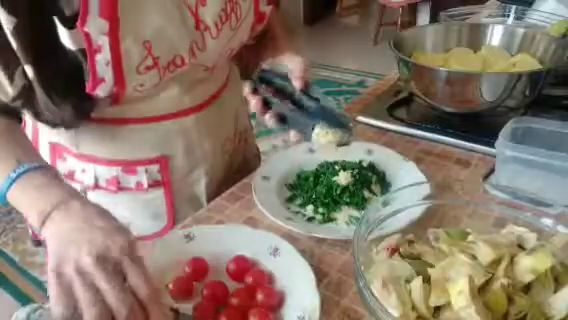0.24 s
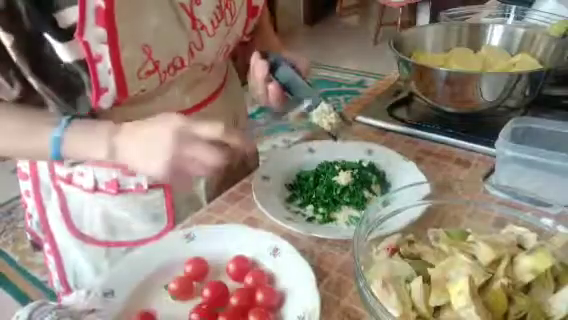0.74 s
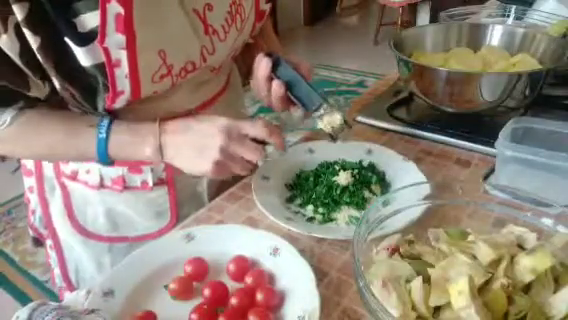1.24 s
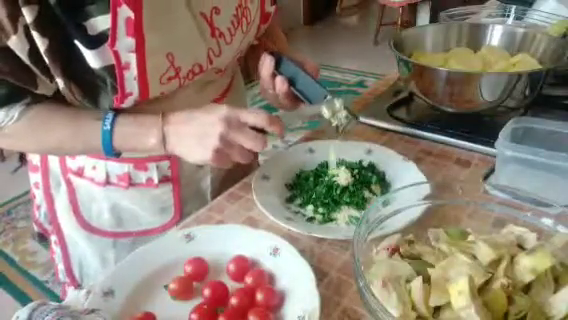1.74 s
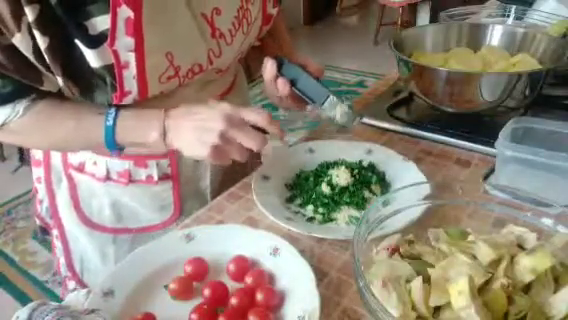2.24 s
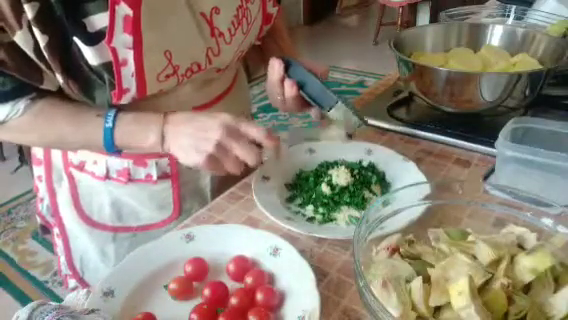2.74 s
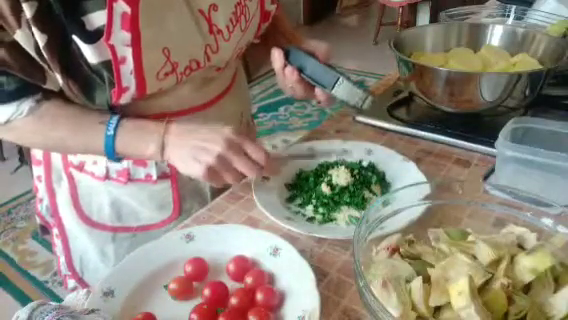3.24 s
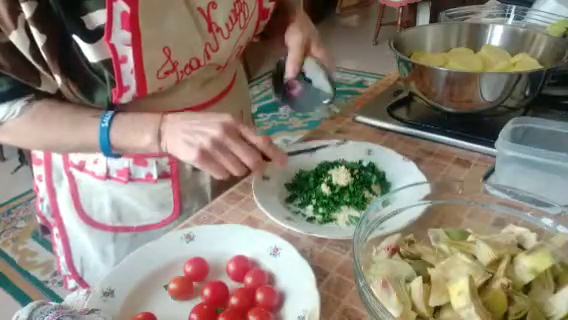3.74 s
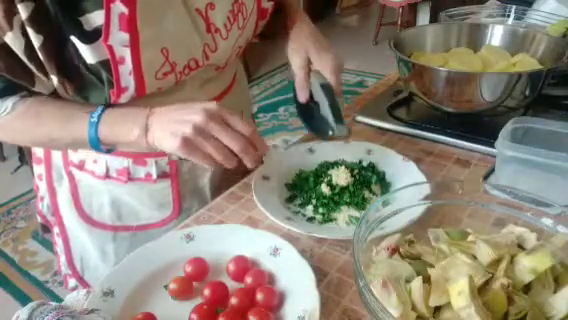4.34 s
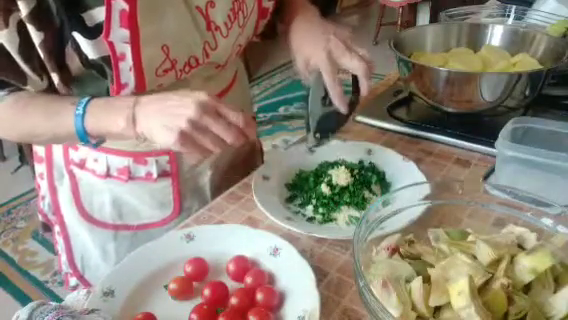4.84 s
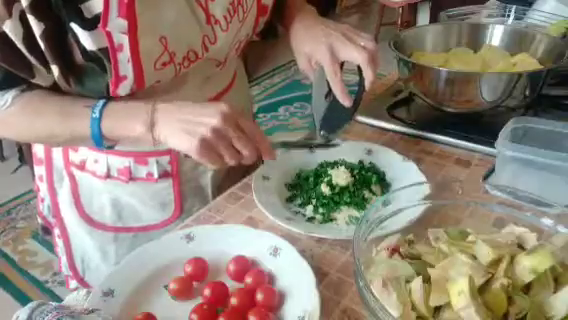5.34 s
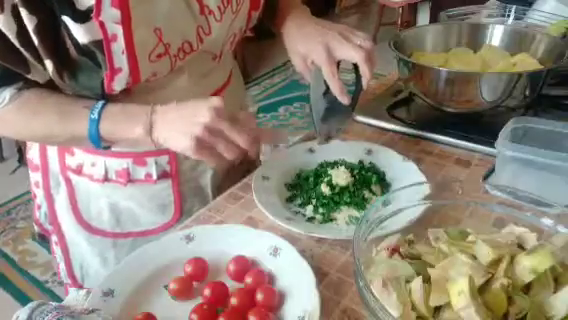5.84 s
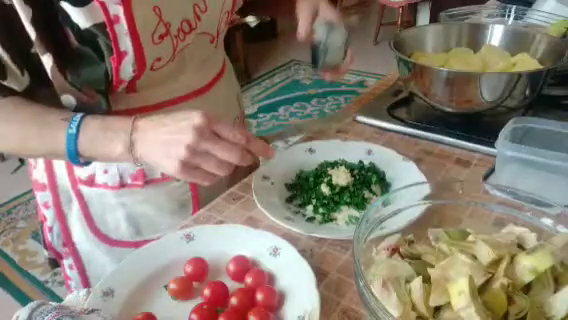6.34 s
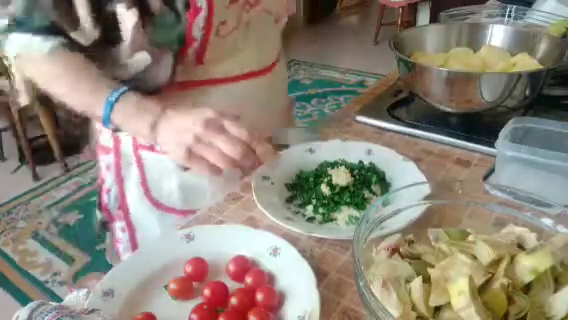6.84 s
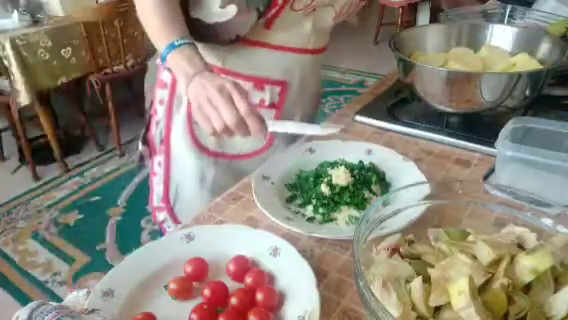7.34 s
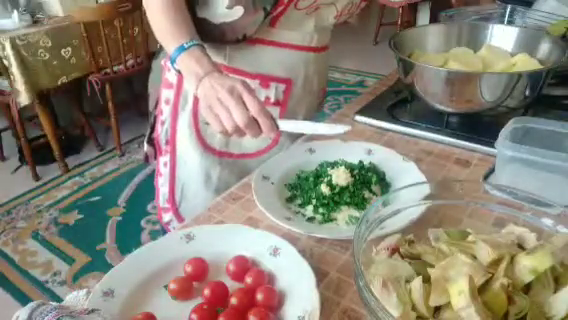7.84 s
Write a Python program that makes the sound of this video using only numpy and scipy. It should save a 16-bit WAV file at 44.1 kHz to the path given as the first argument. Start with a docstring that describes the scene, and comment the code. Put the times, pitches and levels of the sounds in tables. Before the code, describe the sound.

In a quiet home kitchen, a faint rustle and a light ceramic clink come first. After a few weak touches, a table knife scrapes and taps a steel garlic press in quick bright clicks, pauses, then taps harder. A soft low bump follows, and the press is put down on wood with a dull knock and small rattles. Close stereo microphone, short room echo, faint hum.

```python
"""Over a quiet room tone and a hum that comes and goes, a soft rustle is faintly heard and a plate clinks.
A table knife then taps and scrapes crushed garlic off a steel press, with one faint hollow drag early on.
Near the end comes a soft low bump, then the press is put down on wood with a dull knock. Steel, plate and
wood are noisy contacts that ring decaying tones; rasps, rustles, drag and air are shaped noise, and sparse
echoes make the room. Two microphone ports hear the treble differently and the bass alike."""
import sys
import numpy as np
from scipy import signal
from scipy.io import wavfile
from scipy.ndimage import uniform_filter1d

SR = 44100
rng = np.random.default_rng(int(sys.argv[2]) if len(sys.argv) > 2 else 0)


def output_pcm(signal):
    """Save a mono or channel-first signal as 16-bit PCM at the path in sys.argv[1].

    Samples are clipped to [-1, 1] before scaling.
    """
    pcm = np.clip(np.atleast_2d(signal).T, -1, 1) * 32767
    wavfile.write(sys.argv[1], SR, np.round(pcm).astype(np.int16))


N = 357210  # length in samples
HZ = np.fft.rfftfreq(2048, 1 / SR)  # the frequencies on which filter shapes are given
TOUCH_S = .006  # seconds from the start of a blow to its main contact


def amp(db):
    """Turns dB into gain."""
    return 10 ** (np.asarray(db) / 20)


def evened(x):
    """Scales a signal to an rms of 1."""
    return x / np.sqrt(np.mean(x ** 2) + 1e-20)


def read(points, hz):
    """Reads a curve between its points on a log-frequency axis."""
    f, value = np.transpose(points)
    return np.interp(np.log(hz + 1), np.log(f + 1), value)


def add(mix, s, sound):
    """Mixes a stereo sound in at time s, in seconds."""
    part = mix[:, round(s * SR):][:, :sound.shape[1]]
    part += sound[:, :part.shape[1]]


def tone(hz, body_db, edge_db):
    """Lifts or lowers the body (about 1.5 to 4 kHz) and the edge above 10 kHz, in dB."""
    body = 1 / (1 + (hz / 4000) ** 4) / (1 + (1500 / (hz + 1)) ** 4)
    edge = 1 / (1 + (10000 / (hz + 1)) ** 6)
    return body_db * body + edge_db * edge


def tilt(hz, bright_db):
    """Tilts a spectrum by some dB per octave, level near 600 Hz and easing off in the bass."""
    return bright_db * np.log2((hz + 100) / 700)


def coloured(x, shape_db):
    """Filters causally, with the gain given in dB on the frequencies HZ."""
    both_sides_db = np.r_[shape_db, shape_db[-2:0:-1]]
    log_gain = np.log(amp(np.maximum(both_sides_db, -100)))
    # the phase that belongs to this gain puts the energy as early as possible
    response = np.exp(np.conj(signal.hilbert(log_gain)))
    taps = np.fft.ifft(response).real[:len(shape_db)]
    return signal.oaconvolve(x, taps[None], axes=1)[:, :x.shape[1]]


def bass_shared(x, corner_hz):
    """Long waves reach both ports alike, so the bass of the two sides is averaged."""
    low = signal.lfilter(*signal.butter(N=2, Wn=corner_hz, fs=SR), x)
    return x - low + np.sqrt(2) * low.mean(0)


def grit(count, spread_db, most=6):
    """Makes two unlike trains of micro-contacts, a few much larger than the rest."""
    size = np.minimum(rng.exponential(1, count), most)
    return rng.standard_normal((2, count)) * amp(spread_db * size)


def blow(modes, shape_db, chatter_ms, ring_db, rattle_db, detune, count):
    """After a faint first touch, contacts chatter and die out; they crack and set the modes ringing."""
    t = np.arange(count) / SR
    since = t - TOUCH_S
    touch = 0.04 * np.exp(-abs(since) / 0.002) + np.exp(-abs(since) / .0007)
    contacts = grit(count, 2.9) * np.where(since < 0, touch, np.exp(-abs(since) / (chatter_ms / 1000)))

    # each blow has a new spot and grip: other mode levels, phases and pitches
    hz, db, t60 = np.transpose(modes)[:, :, None]
    level, phase, shift = rng.standard_normal((2, 3, len(modes), 1)).swapaxes(0, 1)
    pitch = hz * (1 + detune * shift)
    # the rings flicker at random, each on its own, so they sound rough
    steps = np.repeat(rng.standard_normal((len(modes), count // 160 + 1)), 160, axis=1)[:, :count]
    flicker = rattle_db * np.tanh(2 * uniform_filter1d(steps, size=120, axis=1))
    decay = amp(db + flicker - 60 * t / t60)
    rings = decay * amp(level) * np.sin(2 * np.pi * pitch * t + phase)

    chatter = .5 * contacts[:1] / np.linalg.norm(contacts[0])
    drive = chatter + signal.unit_impulse(count, round(TOUCH_S * SR))
    ring = signal.fftconvolve(drive, rings.sum(1), axes=1)[:, :count]
    crack = coloured(contacts, shape_db)
    return crack / abs(crack).max() + amp(ring_db) * ring / abs(ring).max()


def struck(events, modes, spectrum, ring_db, rattle_db, detune):
    """Plays blows on a plate or a board, each tilted brighter or duller."""
    out = np.zeros((2, N))
    for s, db, chatter_ms, bright_db in events:
        tilted = [(f, mode_db + tilt(f, bright_db), t60) for f, mode_db, t60 in modes]
        shape_db = read(spectrum, HZ) + tilt(HZ, bright_db)
        hit = blow(tilted, shape_db, chatter_ms, ring_db, rattle_db, detune, count=SR // 4)
        add(out, s - TOUCH_S, amp(db) * hit)
    return bass_shared(out, 1100)


# Colour of the room's hiss. Each row: frequency in Hz, strength in dB per Hz.
AIR = [(10, 1), (24, -14.5), (42, -5.5), (62, -11), (82, -20.5), (105, -16), (179, -24.5), (236, -24.5),
       (290, -32.5), (598, -33.5), (743, -34), (1380, -39), (3290, -38.5), (7600, -37.5), (14600, -40),
       (16500, -49.5)]
AIR_DB = -57.5  # level before the swells and soft patches
# How alike the two sides are. Each row: frequency in Hz, likeness (1 is the same).
LIKENESS = [(60, 0.97), (380, 0.28), (2380, 0.032), (15000, 0.24)]
# Slow swells of the room. Each row: time in seconds, swell of the rumble in dB, of the middle band in dB.
SWELLS = [(0, 4, 6.5), (1.2, 0.5, 5), (2.8, 4, 2.5), (3.601, 0.5, 1), (6.102, -1, 2), (6.449, -4, 7),
          (6.802, -3.5, -2), (8.1, 1.5, 5.5)]


def room_tone():
    """Hiss with soft patches; the rumble and the middle band swell on their own."""
    frames, hz = N // 512 + 5, HZ[:, None]
    a, b, c, d, patches = rng.standard_normal((frames, 1025, 5)).T
    patches = uniform_filter1d(patches, size=16, axis=0)
    patches = evened(uniform_filter1d(patches, size=5, axis=1))

    s, *columns = np.transpose(SWELLS)
    low_db, mid_db = (np.interp(np.arange(frames) * 512 / SR, s, column) for column in columns)
    low = 1 / (1 + (hz / 200) ** 4)
    high = 1 / (1 + (2500 / (hz + 1)) ** 4)
    swell = low * low_db + (1 - low) * (1 - high) * mid_db

    same, left = read(LIKENESS, hz), a + 1j * b
    right = same * left + np.sqrt(1 - same ** 2) * (c + 1j * d)
    z = np.array([left, right]) * amp(read(AIR, hz))
    scale = signal.istft(z, nperseg=2048, noverlap=1536)[1].std()
    moving = signal.istft(z * amp(swell + 0.79 * patches), nperseg=2048, noverlap=1536)[1]
    return amp(AIR_DB) / scale * moving[:, :N]


# A low hum that comes and goes. Each row: time in seconds, level in dB.
HUM = [(0, -58.5), (.3, -59), (.9, -59.5), (1.201, -63), (1.6, -61.5), (2, -72), (3.001, -57),
       (3.601, -74.5), (7.3, -68.5), (8.1, -58)]
HUM_HZ, HUM_DRIFT_HZ = 103, 4.7  # middle pitch and usual size of its drift


def hum():
    """A low tone whose pitch drifts."""
    drift = uniform_filter1d(rng.standard_normal(N), size=4000)
    drift = evened(uniform_filter1d(drift, size=4000))
    s, db = np.transpose(HUM)
    level = amp(np.interp(np.arange(N) / SR, s, db))
    return level * np.sin(2 * np.pi * np.cumsum(HUM_HZ + HUM_DRIFT_HZ * drift) / SR)


# Ringing tones of press and blade. Each row: frequency in Hz, level in dB, time to fall 60 dB in seconds.
STEEL = [(1618, -17, 0.046), (2090, -13.5, .03), (2887, -2.5, 0.033), (3840, -15, 0.024),
         (4140, -4.5, .035), (4860, -21.5, 0.03), (5620, -5, 0.01), (6230, -3.5, .03), (6860, -7, 0.04),
         (7650, 0, 0.03), (7770, -6, 0.034), (8730, -3.5, 0.04), (10720, -9.5, 0.028)]


def steel_humps(hz, spread_db):
    """The modes of the steel as humps, each woken more or less by the spot touched."""
    f, db, _ = np.transpose(STEEL)[:, :, None]
    woken = amp(.3 * db + spread_db * rng.standard_normal(f.shape))
    humps = woken / (1 + ((hz - f) / (.04 * f)) ** 2)
    return np.log10(humps.sum(0) + 0.1)


# Colour of steel contact, for rasps and taps. Each row: frequency in Hz, strength in dB per Hz.
CONTACT = [(300, -32.5), (600, -19), (900, -26.5), (1300, -20.5), (1650, -14.5), (2350, -15), (2850, -10.5),
           (3300, -7), (4000, -13), (4500, -8.5), (5700, -11.5), (6600, -10), (8800, -11), (9600, -11),
           (13500, -16), (15700, -20), (16500, -46)]
# Sliding and rustling: short rasps on steel and faint, longer soft hisses.
# Each row: time of the peak in seconds, level in dB, length in ms, lift of the body in dB.
STROKES = [(.08, -60.5, 1150, -12), (1.029, -52.5, 39, -1), (1.14, -51, 147, -15), (1.271, -45.5, 40, -35),
           (1.507, -40.5, 108, -23), (1.805, -24, 47, -8), (2.029, -30.5, 15, 1), (2.085, -21, 35, -5),
           (2.31, -21.5, 18, 3), (2.547, -21, 28, -2), (2.748, -24, 40, 1), (2.772, -26, 14, -7),
           (4.374, -42.5, 81, -12), (5.37, -26.5, 8.1, 3), (5.896, -24, 36, -28), (6.086, -22, 43, -1),
           (7.2, -46.5, 46, -1.5), (7.62, -52, 196, 3.5), (7.879, -56.5, 280, -0.5)]
RISE_SHARE = 0.46  # of a stroke's length, before it peaks
FLAT_TOP = 2.3  # power of a stroke's flanks: higher holds the level longer, then lets go quickly


def strokes():
    """Dense, uneven grit, coloured by the modes of the steel, swells into rasps and soft hisses."""
    catch = evened(uniform_filter1d(rng.standard_normal(N), size=90))  # the edge catches and slips
    rasp = grit(N, 4.78, most=4.0) * amp(1.5 * catch)
    hz, t, z = signal.stft(rasp, SR, nperseg=256, noverlap=192)
    level = np.zeros(z.shape[1:])
    for s, db, length_ms, body_db in STROKES:
        flank_ms = length_ms * np.where(t < s, RISE_SHARE, 1 - RISE_SHARE)
        swell = np.exp(-(abs(t - s) * 1000 / flank_ms) ** FLAT_TOP)
        colour_db = read(CONTACT, hz) + tone(hz, body_db, 0) + 4.7 * steel_humps(hz, 7.5)
        level += amp(db + colour_db)[:, None] * swell
    return signal.istft(z * level, SR, nperseg=256, noverlap=192)[1][:, :N]


# How long echoes last. Each row: frequency in Hz, time to fall 60 dB in seconds.
ROOM = [(150, 0.2), (500, 0.454), (1500, 0.3), (4000, 0.29), (9000, 0.25), (15000, 0.29)]


def kitchen(x):
    """Sparse echoes of random sign, each band dying at its own speed."""
    echoes = np.zeros((2, SR // 2))
    # one echo at a random place in every 12 samples
    at = np.arange(100, SR // 2 - 12, 12) + rng.integers(0, 12, (2, (SR // 2 - 101) // 12))
    np.put_along_axis(echoes, at, rng.choice([-1., 1.], at.shape), 1)
    hz, t, z = signal.stft(echoes, SR, nperseg=256)
    fading = z * amp(-60 * t / read(ROOM, hz)[:, None])
    tail = signal.istft(fading, SR, nperseg=256)[1]
    tail = bass_shared(tail, 1200) / np.linalg.norm(tail[0])
    return signal.oaconvolve(x, tail, axes=1)[:, :N]


# Clinks of the plate. Each row: time in seconds, level in dB, chatter in ms, brightness in dB per octave.
CLINKS = [(0.286, -29, 39, -3), (0.331, -31.5, 2.3, -3), (0.34, -31, 2.3, -16), (0.379, -42, 5.1, -5.5),
          (0.385, -38.5, 5.6, -6), (0.771, -63, 2, -12)]
# Ringing tones of the plate. Each row: frequency in Hz, level in dB, time to fall 60 dB in seconds.
PLATE = [(619, -1.5, 0.059), (687, -3.5, 0.057), (798, -4, 0.1), (1364, -1.5, 0.053), (2155, -4.5, 0.1),
         (3137, -3.5, 0.17), (3820, -7.5, 0.066), (4170, -3.5, 0.047), (5230, -14, 0.098),
         (5460, -16, 0.11), (5860, -18, 0.1), (6960, -11.5, 0.092)]


def plate_clinks():
    """The plate chatters and rings as the knife is lifted off it; its bass is cut."""
    crack = [(100, -89), (350, -66)] + [(f, db) for f, db, _ in PLATE] + [(14000, -24)]
    plate = struck(CLINKS, PLATE, crack, ring_db=6.1, rattle_db=3.4, detune=0.0044)
    return signal.lfilter(*signal.butter(N=2, Wn=380, btype="high", fs=SR), plate)


# Knife on press. Each row: time in seconds, level in dB, lift of the body in dB, most lifted note in Hz.
TAPS = [(0.917, -36.5, 11, 3850), (1.471, -32.5, 7, 1640), (1.737, -23.5, 11, 3800),
        (2.2849, -23.5, 0.5, 7300), (2.3077, -8.5, -48.5, 7044), (2.4831, -13.5, -3, 6300),
        (2.5478, -10, -12, 8300), (2.5533, -12.5, -6.5, 7240), (2.7043, -14, -3, 4400),
        (2.7445, -10, -2, 3500), (2.7527, -12, 2, 7900), (2.7692, -13, -8, 7550), (2.7732, -9, -14.5, 7430),
        (4.1829, -12, -4, 2230), (4.435, -28, 11.5, 7000), (4.922, -5, 11, 5580), (4.9858, -18, 7.5, 7150),
        (5.35, -9.5, -10, 6600), (5.3536, -12.5, 7, 6200), (5.4085, -10, -39.5, 8660),
        (5.4126, -8, 0.5, 9570), (5.5358, -2.5, 13.5, 8530), (5.7041, -6, 5, 2440), (5.878, -7, 13.5, 8460),
        (5.907, -18.5, -28.5, 6400), (6.0506, -5, -5, 8730), (6.0768, -5, -32.5, 6900),
        (6.118, -9, -14, 6750)]
# A blade that lands afresh chatters longer than one that bounces.
# Each: ring in dB, lift of the edge above 10 kHz in dB, chatter in ms.
LANDING, BOUNCE = (-10.5, 5.8, 4.7), (-10, -6, 1.8)
LOOSE_S = .07  # a tap sooner than this after the last, in seconds, is a bounce
RATTLE_DB = 7  # how far the steel rings flicker, up or down


def knife_taps():
    """Bright cracks with a short, rough steel ring, lifted around the note of the spot struck."""
    out, last_s = np.zeros((2, N)), 0
    hz, mode_db, t60 = np.transpose(STEEL + STEEL)  # blade and press ring close together
    for s, db, body_db, ring_hz in TAPS:
        ring_db, edge_db, chatter_ms = BOUNCE if s - last_s < LOOSE_S else LANDING
        spot_db = tone(HZ, body_db, edge_db) + 9.4 / (1 + ((HZ - ring_hz) / 600) ** 2)
        modes = np.c_[hz, mode_db + np.interp(hz, HZ, spot_db), t60]
        # the crack already carries the modes as humps
        crack_db = read(CONTACT, HZ) + spot_db + 8.3 * steel_humps(HZ, 4.4)
        tap = blow(modes, crack_db, chatter_ms, ring_db, RATTLE_DB, detune=0.018, count=SR // 10)
        add(out, s - TOUCH_S, tap * amp(db))
        last_s = s
    return out


# Resonances of a faint hollow drag. Each row: frequency in Hz, width in Hz, level in dB.
DRAG_BANDS = [(673, 26, 0), (1110, 140, -23), (1550, 51, 2), (2730, 110, -20)]
DRAG_START_S, DRAG_LENGTH_S = 1.12, .32
DRAG_DB = -67.5  # level before the fades


def drag():
    """Uneven friction noise in a few narrow resonances, swelling and fading once."""
    out, rub = np.zeros((2, N)), grit(round(DRAG_LENGTH_S * SR), 3.5)
    bands = np.zeros(rub.shape)
    for hz, width, band_db in DRAG_BANDS:
        band = signal.lfilter(*signal.iirpeak(hz, hz / width, SR), rub)
        bands += amp(band_db) * evened(band)
    swell = signal.windows.tukey(rub.shape[1], .5)
    add(out, DRAG_START_S, amp(DRAG_DB) * evened(bands) * swell)
    return out


# Dull blows on wood: first a soft low bump, perhaps a footstep, then the press put down.
# Each row: time in seconds, level in dB, chatter in ms, brightness in dB per octave.
KNOCKS = [(6.79, -50, 19, 3), (6.808, -43, 44, -16), (7.384, -14, 7.5, 2), (7.414, -22.5, 9.2, 2.5),
          (7.445, -33, 90, 0), (7.49, -36, 46, -4.5), (7.557, -33.5, 8, -0.5), (7.568, -29.5, 15, -0.5),
          (7.6, -35.5, 73, -1.5)]
# Ringing tones of the wood. Each row: frequency in Hz, level in dB, time to fall 60 dB in seconds.
WOOD = [(74, -19, 0.25), (106.4, -11.5, 0.23), (124, -12, 0.23), (159.5, -10, 0.56), (200.6, -10, 0.3),
        (270, -8.5, 0.19), (351, -4, 0.053), (579, -0.5, 0.081), (608, -0.5, .1), (644, 0, 0.038),
        (837, 0, 0.058), (1096, -8, 0.052)]
# Colour of the blunt blow itself. Each row: frequency in Hz, strength in dB per Hz.
KNOCK = [(35, -47), (60, -10.5), (150, -3.5), (300, -8), (480, -8.5), (620, -3), (1050, -8), (1300, -16.5),
         (1700, -9.5), (2580, -25), (6280, -27), (16000, -50)]


def board_knocks():
    """Blunt contacts on wood drive its low modes into dull knocks."""
    return struck(KNOCKS, WOOD, KNOCK, ring_db=0.1, rattle_db=5.0, detune=0.0022)


# How the two ports differ. Each row: frequency in Hz, left minus right in dB.
PORTS = [(60, -1.5), (130, -3.5), (290, -2.0), (640, -1.5), (1410, 1.5), (3100, 1), (6820, -5.5),
         (15000, 3)]


def scene():
    """Steel near the microphone, plate and board, their echoes and the room."""
    steel = knife_taps() + strokes()
    # small parts radiate no bass
    steel = signal.lfilter(*signal.butter(N=3, Wn=400, btype="high", fs=SR), steel)
    lean = read(PORTS, HZ) / 2
    steel = np.r_[coloured(steel[:1], lean), coloured(steel[1:], -lean)]
    plate = plate_clinks()
    board = board_knocks()
    echoes = kitchen(amp(-8.5) * steel + amp(-13.0) * plate + amp(-2.5) * board)
    return steel + plate + board + echoes + drag() + room_tone() + hum()


def record(dry):
    """Overload just under full scale, then the upper band limit at 16.2 kHz."""
    band_limit = signal.firwin(255, 16200, window=("kaiser", 8), fs=SR)
    return signal.oaconvolve(np.clip(dry, -.95, .95), band_limit[None], "same")


dry = scene()
out = record(dry)
output_pcm(out)
```